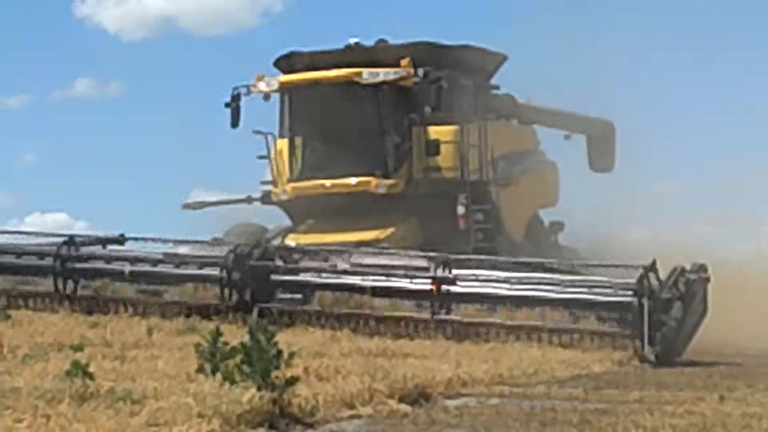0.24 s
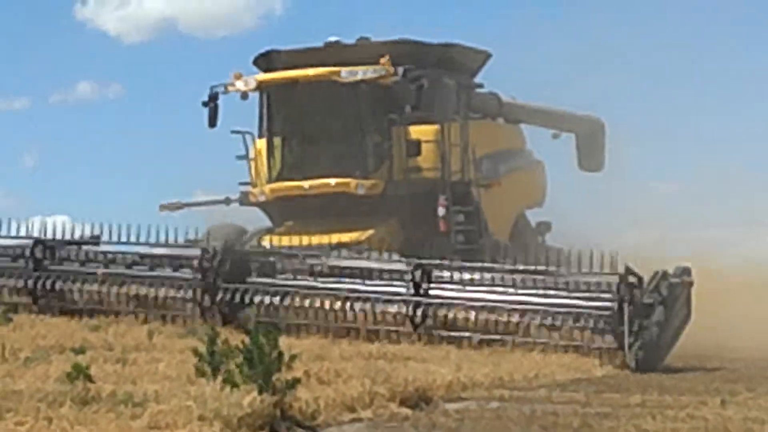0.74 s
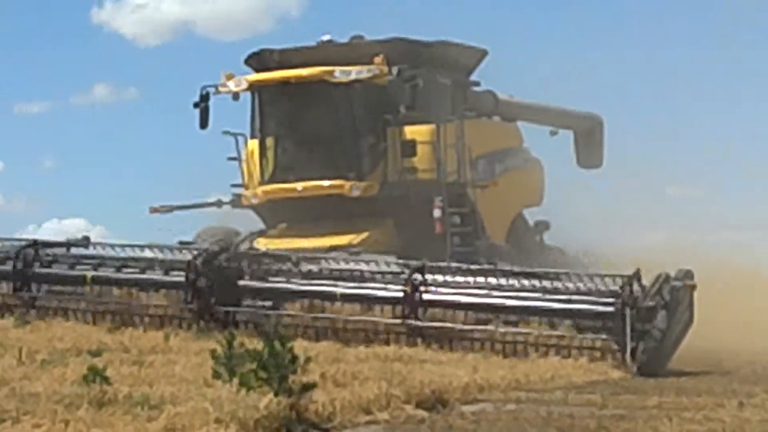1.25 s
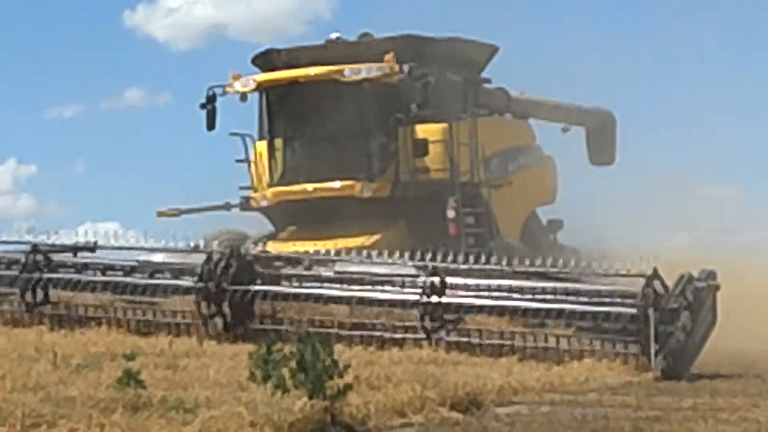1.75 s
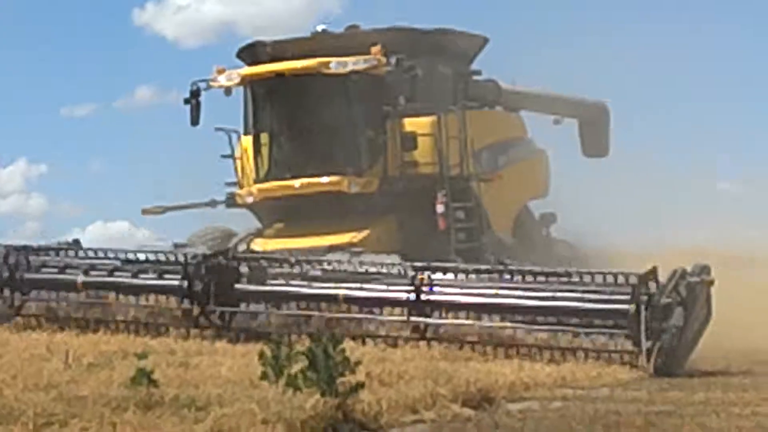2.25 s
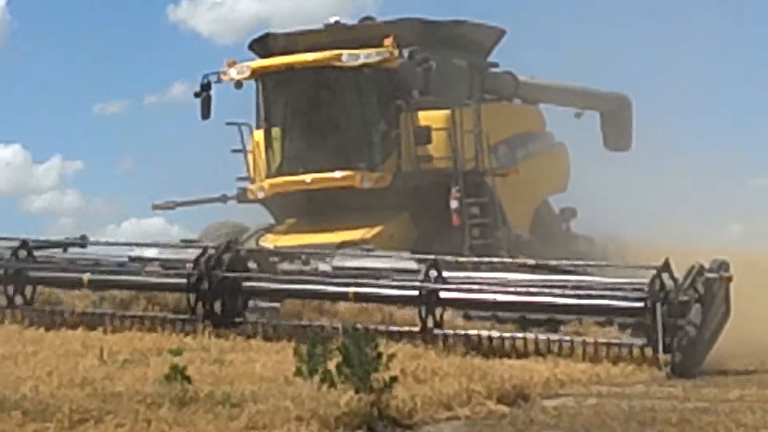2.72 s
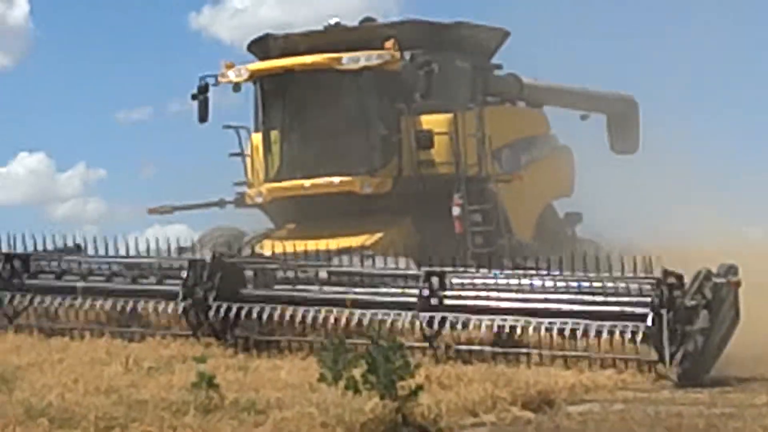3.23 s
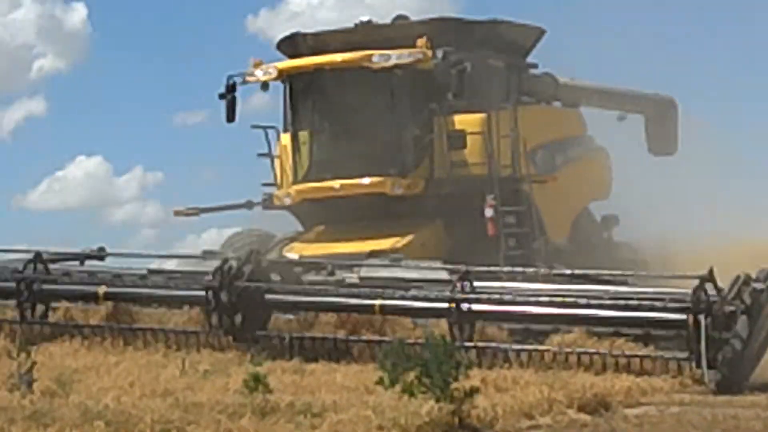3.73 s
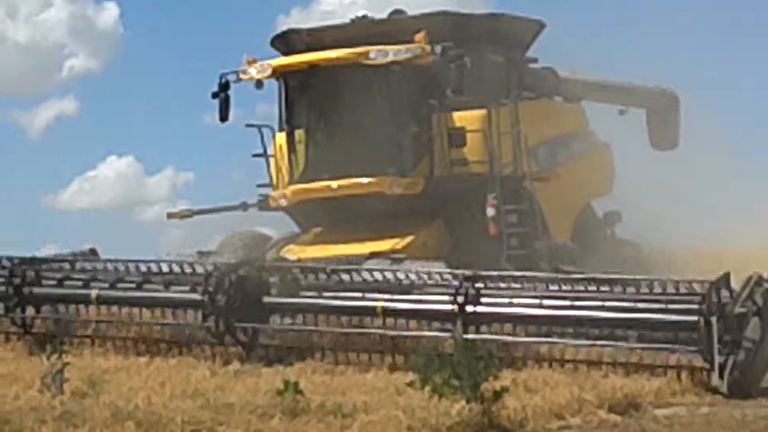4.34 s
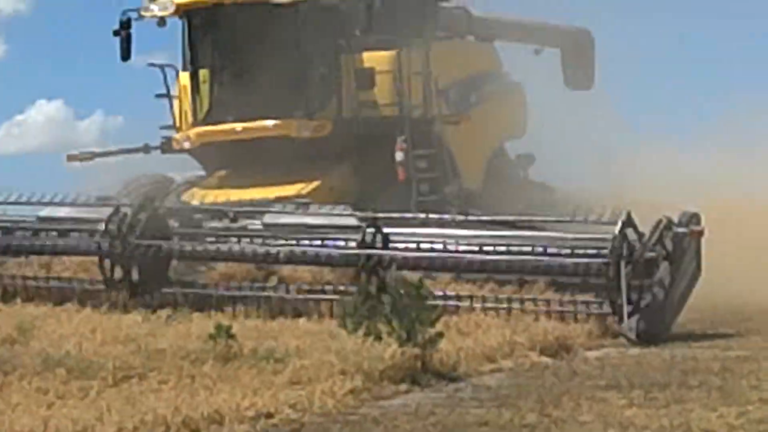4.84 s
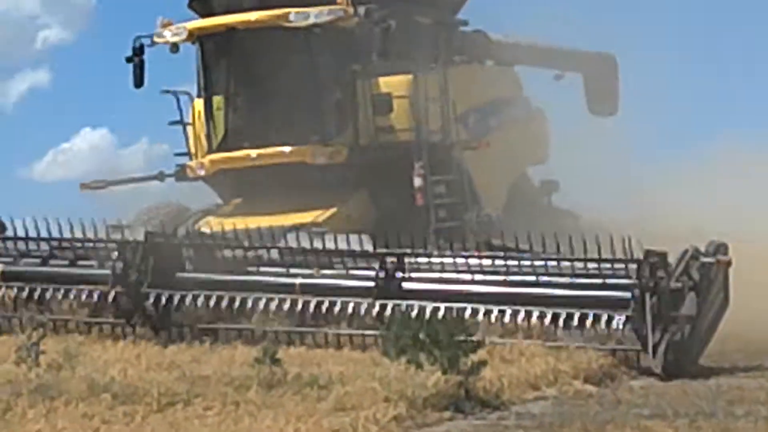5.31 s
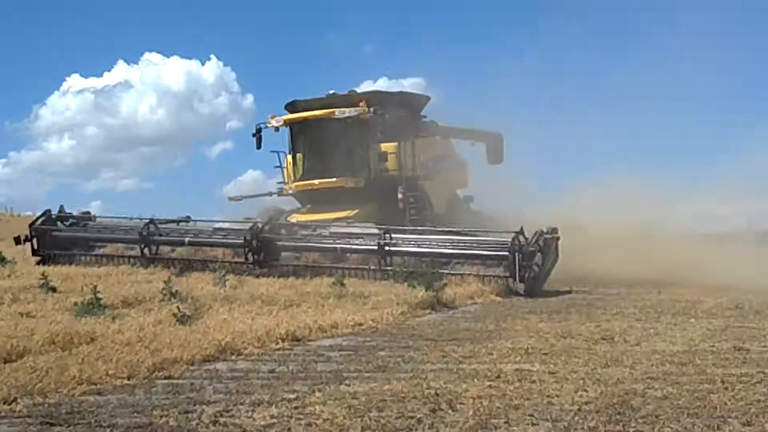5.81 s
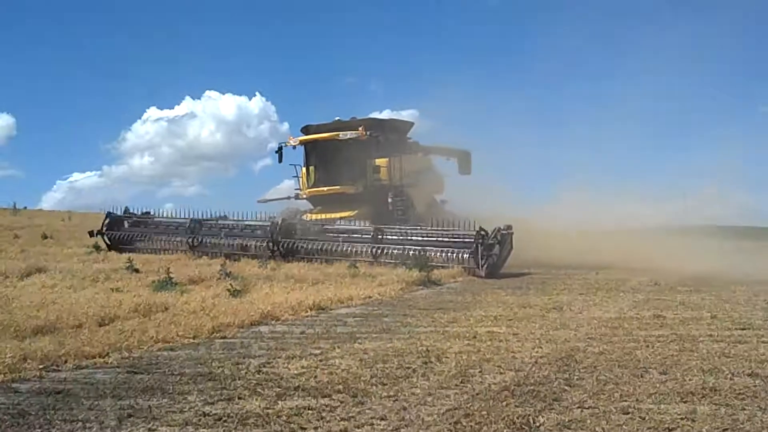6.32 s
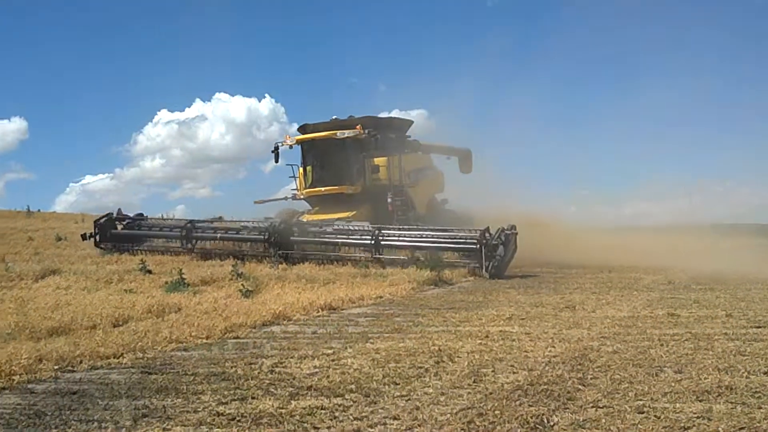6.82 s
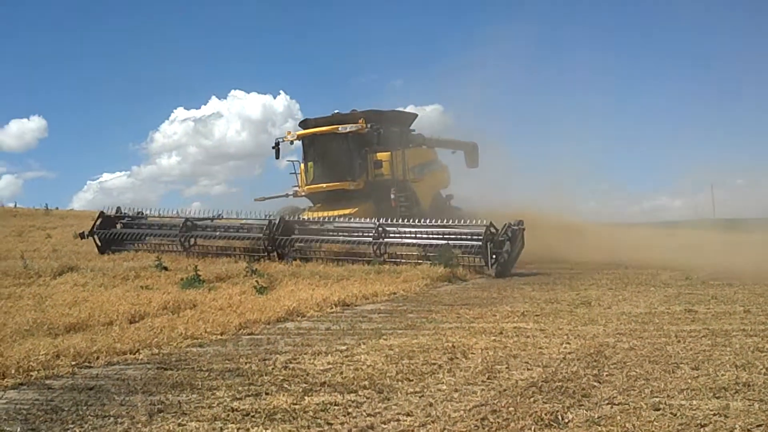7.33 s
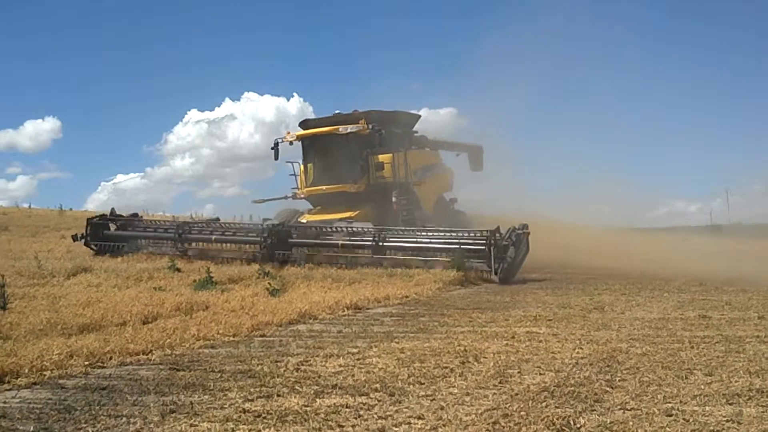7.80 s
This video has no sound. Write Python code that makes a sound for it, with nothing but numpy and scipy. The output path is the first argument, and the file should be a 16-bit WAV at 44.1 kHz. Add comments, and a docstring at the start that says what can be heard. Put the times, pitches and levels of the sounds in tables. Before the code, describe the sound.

Outdoors in a gusty field, a combine harvester some way off runs without pause: a low, slightly wavering engine hum, a whooshing fan with a faint whine, a broad threshing roar and a fine chaffy hiss. Wind rumbles and thuds on a small stereo camera microphone, chiefly on the right. Gusts grow heavy around two seconds and again near five to six, briefly dulling the machine.

```python
"""A field on a gusty day, with a combine harvester some way off. Shaft and gear sines make the hum and whine,
resonant air noise the fan whoosh, shaped noise the threshing roar and the hiss of knife and chaff.
Turbulence noise and short wavelets buffet chiefly the right port of a small two-port camera microphone,
whose widening circuit subtracts each port, slightly delayed, from the other."""
import sys
import numpy as np
from scipy import signal
from scipy.fft import rfft, irfft
from scipy.io import wavfile
from scipy.ndimage import uniform_filter1d

SR = 44100
rng = np.random.default_rng(int(sys.argv[2]) if len(sys.argv) > 2 else 0)


def wrap_up_sound(samples):
    """Save the sound to the file named by the first command line argument, as 16-bit audio."""
    columns = np.atleast_2d(samples).T
    # keep every value between -1 and 1, then stretch to whole-number steps
    tamed = np.clip(columns, -1, 1)
    steps = np.round(tamed * 32767).astype(np.int16)
    wavfile.write(sys.argv[1], SR, steps)


N = 355446

# Fan level within the machine. Each row: time in seconds, relative level in dB.
FAN_LEVEL = [(0, -0.5), (1.2, 0), (2.6, 2), (3.4, -2), (4.6, 0), (5.3, 0.5), (6.4, 3), (6.9, -2), (7.4, 3),
             (8.06, 1.5)]


def gain_of(db):
    """Decibels to amplitude gain."""
    return 10 ** (np.asarray(db) / 20)


def evened(x):
    """Scales to rms 1."""
    return x / np.sqrt(np.mean(x ** 2) + 1e-20)


def read(hz, f, value):
    """Interpolates a spectrum along log frequency."""
    return np.interp(np.log(hz + 1), np.log(f + 1), value)


def curve(rows):
    """Joins (seconds, value) rows by straight lines, sample by sample."""
    return np.interp(np.arange(N) / SR, *np.transpose(rows))


def drift(top_hz):
    """Slow random wander of rms 1: noise rolled off around top_hz."""
    z = rfft(rng.standard_normal(N))
    rolloff = 1 + (np.fft.rfftfreq(N, 1 / SR) / top_hz) ** 2
    return evened(irfft(z / rolloff, N))


def noise(points, patchy_db, tilt_db=0, tilt_hz=(250, 1000), count=1):
    """Random short-time spectra with drifting patches; tilt_db per octave within tilt_hz may vary in time."""
    frame = 512
    hop = frame // 4
    frames, hz = 4 * N // frame + 5, np.fft.rfftfreq(frame, 1 / SR)
    patches = rng.standard_normal((frames, len(hz))).T
    patches = uniform_filter1d(patches, size=7, axis=0)  # across frequency
    patches = evened(uniform_filter1d(patches, size=16, axis=1))  # across time
    tilt_db = np.resize((tilt_db * np.ones(N))[::hop], frames)
    octaves = np.log2(np.clip(hz, *tilt_hz) / tilt_hz[0])
    db = read(hz, *np.transpose(points))[:, None] + patchy_db * patches
    db = db + octaves[:, None] * tilt_db
    z = rng.standard_normal((count, len(hz), frames, 2)) @ [1, 1j]
    sound = signal.istft(z * gain_of(db), nperseg=frame, noverlap=frame - hop)[1]
    return evened(sound[:, :N])


def engine():
    """Firing hum, a shaft hum just above that beats with it, and gear tones, wavering in time and strength."""
    # Each row: pitch in Hz, relative level in dB.
    hums = [(103.05, -26.5), (105.53, -31), (206.1, -41), (211.1, -39.5), (306.8, -44.5), (618, -55.5),
            (707.2, -51.5), (771.8, -52), (824, -51), (880, -53), (952.2, -58)]
    # Hum level within the machine. Each row: time in seconds, relative level in dB.
    hum_level = [(0, 0), (0.8, 0), (1.6, 4), (2.4, -0.5), (3.6, 1), (4.8, 2), (5.4, 0), (6.2, 3), (7, -1.5),
                 (8.06, -2)]
    in_step_s, wobble_s = 3.38, 0.00012  # moment when the hums add up; rms timing wander
    t = np.arange(N) / SR - in_step_s
    tones = 0
    for hz, db in hums:
        strength = gain_of(db + 1.1 * drift(2.7))
        tones = tones + strength * np.sin(2 * np.pi * hz * (t + wobble_s * drift(2.1)))
    return tones * gain_of(curve(hum_level))


def fan():
    """Air noise through one broad and several narrow resonances, swelling briefly at times."""
    # Each row: centre in Hz, width in Hz, relative level in dB.
    resonances = [(542, 174, -33.5), (1061, 47, -48.5), (861, 3.2, -52), (852, 3.3, -55),
                  (1568, 4.7, -57.5), (2220, 7, -61)]
    # Each row: centre of the swell in seconds, boost in dB.
    swells = [(0.84, 2.5), (1.02, 3.5), (1.09, 7), (1.23, 4), (1.35, 9), (1.44, 6), (1.58, 1.5), (1.7, 4),
              (4.05, 1), (6.26, 1), (7.13, 2.5), (7.35, 0), (7.68, 6.5), (8.01, 5.5)]
    swell_s = 0.022  # to 1/e of the dB boost
    f, t = np.fft.rfftfreq(N, 1 / SR), np.arange(N) / SR
    power = 0
    for hz, width_hz, db in resonances:
        response = evened(1 / (1 + (2 * (f - hz) / width_hz) ** 2))
        power = power + (gain_of(db) * response) ** 2
    air = irfft(rfft(rng.standard_normal((2, N))) * np.sqrt(power), N)
    swell_db = sum(db * np.exp(-((t - s) / swell_s) ** 2) for s, db in swells)
    return air * gain_of(curve(FAN_LEVEL) + swell_db + 0.86 * drift(27))


def whine():
    """Fan blade tone and overtones on one unsteady shaft speed, fluttering in strength."""
    # Each row: multiple of the blade pitch, relative rms level in dB.
    overtones = [(1, -40), (2, -51), (3, -52)]
    blade_hz, waver, flutter_db = 529, 0.011, 3  # waver: rms fraction of the pitch
    turns = np.cumsum(blade_hz * (1 + waver * drift(7))) / SR  # cycles of the blade tone
    tones = 0
    for k, db in overtones:
        tones = tones + gain_of(db + flutter_db * drift(12)) * np.sin(2 * np.pi * k * turns)
    return np.sqrt(2) * tones * gain_of(curve(FAN_LEVEL))


def threshing():
    """Broad roar of drum, sieves and straw: patchy shaped noise."""
    # Spectral shape at the left port. Each row: frequency in Hz, relative density in dB.
    roar_shape = [(25, -1), (50, 20), (90, -1.5), (140, 13), (210, -10.5), (340, -14.5), (700, -15.5),
                  (1100, -14.5), (1700, -19), (2200, -17), (2600, -60), (4000, -65), (8000, -54)]
    level_db = -26 + 0.44 * drift(41)
    return gain_of(level_db) * noise(roar_shape, patchy_db=1.5, count=2)


def knife():
    """Knife and chaff hiss, throbbing with each cutter bar stroke and flickering with the crop."""
    # Spectral shape at the left port, before tilt. Each row: frequency in Hz, relative density in dB.
    hiss_shape = [(1500, -30), (2300, -5), (2750, -5), (3400, 0), (4600, -2), (5600, -1), (6400, -6),
                  (7050, -11), (7800, -5), (9200, -6), (11000, -13), (13000, -16), (15000, -13),
                  (16500, -16)]
    stroke_hz = 21.16
    t = np.arange(N) / SR
    throb_db = 0.64 * np.cos(2 * np.pi * stroke_hz * t + 1.14)
    level_db = -36.5 + throb_db + 0.24 * drift(32)
    tilt_db = -2.5 + 0.56 * t  # per octave; brightens as the machine creeps nearer and turns
    hiss = noise(hiss_shape, patchy_db=1.28, tilt_db=tilt_db, tilt_hz=(5000, 14000), count=2)
    return gain_of(level_db) * hiss


def at_ports(pair, tone):
    """The right port hears a later, partly unlike version of the left, its level changed by frequency."""
    # Each row: frequency in Hz, likeness to left from 0 to 1, level against left in dB, lag in radians.
    ports = [(60, 0.96, 0, 0.14), (287, 0.99, -3, 0.24), (570, 0.97, 0.5, 0.024), (770, 0.98, -3.5, 0.81),
             (1050, 1, -3.5, 0.72), (1917, 0.7, 2, 2.22), (2220, 0.76, -6.5, 3.75), (2318, 0.83, 4, 1.76),
             (2814, 1, -6, 3.54), (3660, 0.86, -18, 5.16), (5210, 0.92, -8, 8.9), (6930, 0.68, -2.5, 14.15),
             (7800, 0, -4.5, 1.9), (11300, 0.56, -1, 2.47), (13800, 0, 3, 0.47)]
    hz = np.fft.rfftfreq(N, 1 / SR)
    f, like, level_db, lag_rad = np.transpose(ports)
    like = np.clip(read(hz, f, like), 0, 1)
    left, other = rfft(pair[0] + tone), rfft(pair[1])
    late = np.exp(-1j * read(hz, f, lag_rad))
    right = like * late * left + np.sqrt(1 - like ** 2) * other
    right = right * gain_of(read(hz, f, level_db))
    return np.array([pair[0] + tone, irfft(right, N)])


def machine_db():
    """Machine level: drops fall quickly and climb back at one rate; the deepest holds sway."""
    # Drops at the strongest gusts. Each row: time in seconds, level after the drop in dB, before smoothing.
    drops = [(0.0, -8), (1.785, -9), (2.0, -8), (2.31, -12), (3.17, -5), (3.68, -2.5), (4.14, -4.5),
             (4.98, -8.5), (5.25, -9.5), (5.46, -10.5), (5.75, -9.5), (6.76, -5), (7.4, -2), (7.76, -2)]
    climb_db_per_s, full_db, smooth_s = 10.5, 1.0, 0.07
    t, out = np.arange(N) / SR, np.full(N, full_db)
    for s, db in drops:
        out = np.minimum(out, np.where(t < s, full_db, db + climb_db_per_s * (t - s)))
    return uniform_filter1d(out, size=round(smooth_s * SR))


def wind_db():
    """Gusts rise, hold and fall away over a wandering lull; the strongest wins."""
    # Each row: plateau start in seconds, plateau length in seconds, relative level in dB.
    gusts = [(0.02, 0.011, -23.5), (0.197, 0.12, -28.5), (0.39, 0.028, -29), (0.78, 0.13, -29),
             (0.93, .05, -34), (1.077, .05, -31), (1.388, 0.088, -29), (1.7, 0.21, -19.5),
             (1.912, 0.044, -15), (2.008, 0.048, -20), (2.22, .02, -21), (2.28, 0.044, -15.5),
             (2.348, 0.12, -22), (2.515, 0.041, -24.5), (2.625, 0.043, -29), (2.77, .01, -26.5),
             (2.8, 0.01, -29), (2.928, 0.057, -24), (3.04, 0.083, -24), (3.137, 0.057, -20),
             (3.218, .03, -30), (3.28, 0.07, -27), (3.525, 0.033, -20.5), (3.63, 0.078, -27),
             (3.775, 0.026, -28), (4.046, 0.018, -21), (4.1, 0.027, -17), (4.213, 0.01, -22),
             (4.288, .01, -27), (4.35, 0.17, -21.5), (4.597, 0.061, -24), (4.884, 0.057, -20),
             (4.968, 0.052, -14.5), (5.03, 0.28, -17), (5.342, 0.22, -18), (5.586, 0.16, -19.5),
             (5.778, 0.14, -16), (5.99, 0.063, -21), (6.14, 0.016, -28), (6.19, 0.073, -21.5),
             (6.312, 0.025, -26.5), (6.62, 0.14, -18), (6.8, 0.11, -20), (7.02, 0.069, -28.5),
             (7.256, .07, -32.5), (7.348, 0.023, -20), (7.436, .01, -37), (7.492, 0.024, -26),
             (7.704, 0.049, -21)]
    rise_db_per_s, fall_db_per_s = 256, 258
    t, out = np.arange(N) / SR, -33.5 + 2.5 * drift(2.1)
    for s, length_s, db in gusts:
        rise_db = rise_db_per_s * np.maximum(s - t, 0)
        fall_db = fall_db_per_s * np.maximum(t - s - length_s, 0)
        out = np.maximum(out, db - rise_db - fall_db)
    return out


def wind():
    """Lumpy low turbulence that brightens as it strengthens, with hard buffets replacing it briefly."""
    # Spectral shape of gentle wind, before tilt. Each row: frequency in Hz, relative density in dB.
    eddy_shape = [(18, -40), (40, -4), (96, 2), (150, -1), (335, -10.5), (474, -12), (800, -33),
                  (1300, -42), (3000, -103)]
    # Each row: centre in seconds, relative wavelet level in dB, pitch in Hz.
    buffets = [(0.441, -14.0, 171.0), (1.726, -10.0, 123.0), (1.764, -8.0, 210.0), (1.784, -2.0, 340.0),
               (1.796, -8.0, 290.0), (1.812, -8.0, 225.0), (1.82, -12.0, 420.0), (1.872, -10.0, 187.0),
               (1.929, -6.0, 400.0), (1.947, -8.0, 230.0), (1.972, -15.0, 450.0), (2.061, -11.0, 225.0),
               (2.292, -4.0, 179.0), (2.329, -8.0, 216.0), (2.378, -12.0, 361.0), (2.45, -13.0, 300.0),
               (2.809, -14.0, 178.0), (3.165, -10.0, 300.0), (3.172, -8.0, 330.0), (3.188, -11.0, 162.0),
               (3.593, -11.0, 286.0), (3.636, -9.0, 210.0), (3.674, -11.0, 208.0), (4.056, -6.0, 156.0),
               (4.135, -6.0, 232.0), (4.148, -7.0, 165.0), (4.354, -8.0, 214.0), (4.386, -10.0, 195.0),
               (4.41, -11.0, 158.0), (4.459, -8.0, 197.0), (4.481, -11.0, 259.0), (4.504, -10.0, 311.0),
               (4.67, -12.0, 204.0), (4.934, -9.0, 161.0), (5.0, -3.0, 286.0), (5.065, -10.0, 237.0),
               (5.1, -9.0, 176.0), (5.134, -7.0, 220.0), (5.147, -8.0, 300.0), (5.186, -8.0, 171.0),
               (5.2, -7.0, 154.0), (5.211, -7.0, 272.0), (5.224, -8.0, 168.0), (5.258, -6.0, 242.0),
               (5.292, -7.0, 368.0), (5.348, -11.0, 356.0), (5.364, -6.0, 311.0), (5.431, -7.0, 242.0),
               (5.452, -9.0, 620.0), (5.466, -7.0, 232.0), (5.481, -9.0, 251.0), (5.493, -8.0, 266.0),
               (5.529, -8.0, 350.0), (5.642, -10.0, 225.0), (5.678, -11.0, 420.0), (5.711, -6.0, 350.0),
               (5.768, -8.0, 214.0), (5.787, -11.0, 520.0), (5.815, -6.0, 179.0), (5.861, -7.0, 168.0),
               (5.886, -7.0, 216.0), (5.914, -8.0, 223.0), (6.008, -8.0, 248.0), (6.144, -13.0, 130.0),
               (6.653, -11.0, 218.0), (6.672, -10.0, 230.0), (6.709, -10.0, 147.0), (6.747, -6.0, 220.0),
               (6.789, -9.0, 147.0), (6.83, -10.0, 225.0), (6.868, -9.0, 259.0), (6.885, -11.0, 216.0),
               (6.898, -10.0, 214.0), (7.354, -5.0, 235.0), (7.521, -7.0, 820.0), (7.736, -7.0, 302.0),
               (7.769, -11.0, 154.0)]
    lag_rad, half = 0.9, 900  # wobble behind push; half window in samples
    level_db = wind_db()
    eddies = noise(eddy_shape, patchy_db=2.5, tilt_db=0.23 * (level_db + 28.0))[0]
    local_power = uniform_filter1d(eddies ** 2, size=1100)
    eddies = eddies / np.sqrt(abs(local_power) + 0.011)  # evens strength between lumps
    out = gain_of(level_db + 1.6 * drift(37)) * eddies
    signs = rng.choice([-1., 1.], len(buffets))
    for (s, db, hz), sign in zip(buffets, signs):
        u = np.arange(-half, half) / SR * hz  # cycles
        at = round(s * SR) - half
        part = slice(at, at + len(u))
        lump = np.exp((0.1 - np.hypot(u, 0.1)) / 0.34)  # sharp push, short wobble either side
        push = sign * gain_of(db) * lump * np.cos(2 * np.pi * u - lag_rad)
        out[part] = out[part] * (1 - lump) + push
    return out


def scene():
    """Left and right ports; the moving air makes the whole machine flicker a little."""
    # Each row: time in seconds, relative roar level in dB, relative hiss level in dB.
    crop = [(0, 1, -1), (0.8, 0, 1), (1.6, 1.5, 0), (2.6, 0.5, 0.5), (3.4, -0.5, 0.5), (4.4, -0.5, -0.5),
            (5.6, 0, 0), (6.4, 0, 2), (7, -0.5, -0.5), (7.5, -1.5, -0.5), (8.06, -0.5, -0.5)]
    roar_gain = gain_of(curve(np.take(crop, [0, 1], axis=1)))
    hiss_gain = gain_of(curve(np.take(crop, [0, 2], axis=1)))
    tone = engine() + whine()
    pair = fan() + roar_gain * threshing() + hiss_gain * knife()
    machine = at_ports(pair, tone) * gain_of(machine_db() + 0.5 * drift(25))
    return machine + wind() * gain_of([[-26], [0]])  # wind chiefly on the right


def record(dry):
    """Low cut, slight lopsided overload, widening by delayed cross-subtraction, then the band limit."""
    low_cut_hz, edge_hz, lag_samples = 102, 15710, 16
    cut = signal.sosfilt(signal.butter(3, low_cut_hz, "high", fs=SR, output="sos"), dry)
    bent = 1.201 * np.tanh(cut / 1.199 + 0.075)
    bent = bent - bent.mean(axis=1, keepdims=True)
    late = np.pad(bent, ((0, 0), (lag_samples, 0)))[:, :N]
    wide = bent - late[::-1]  # each port minus the other, delayed
    band = signal.firwin(1023, edge_hz, window=("kaiser", 10), fs=SR)
    return signal.oaconvolve(wide, band[None], "same")


dry = scene()
out = record(dry)
wrap_up_sound(out)
```